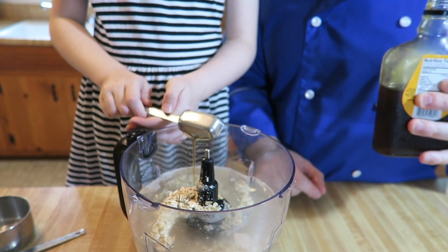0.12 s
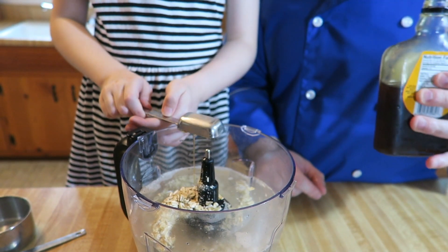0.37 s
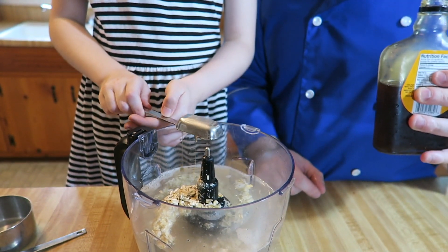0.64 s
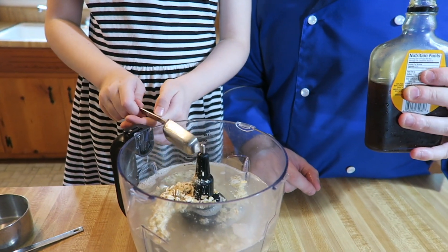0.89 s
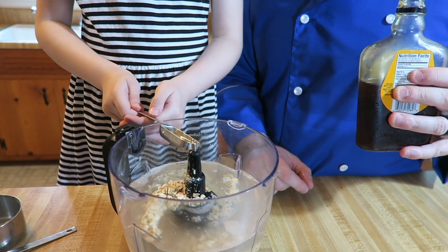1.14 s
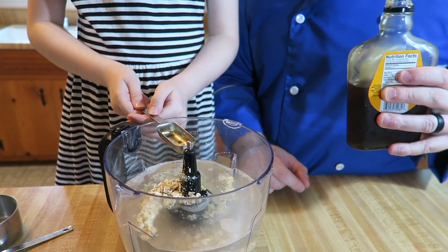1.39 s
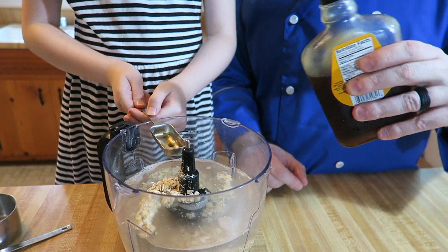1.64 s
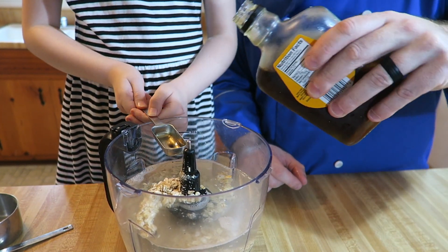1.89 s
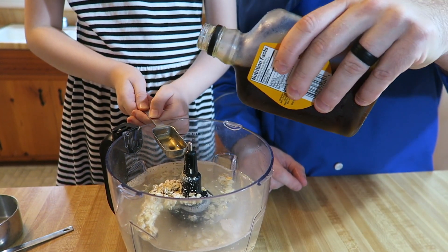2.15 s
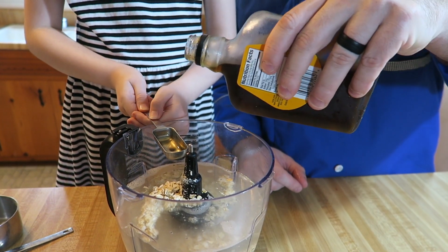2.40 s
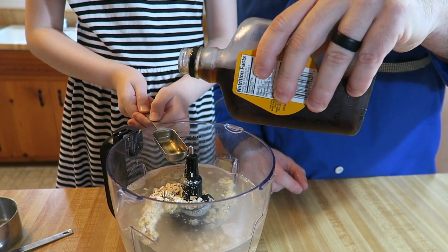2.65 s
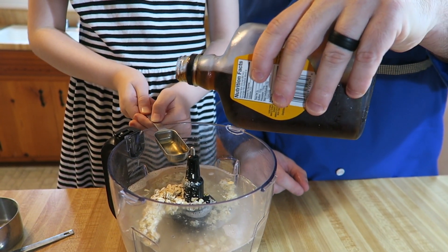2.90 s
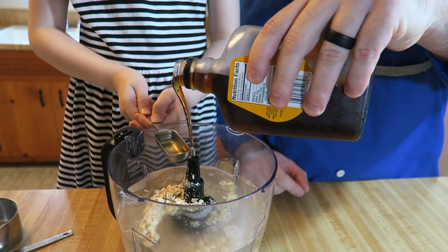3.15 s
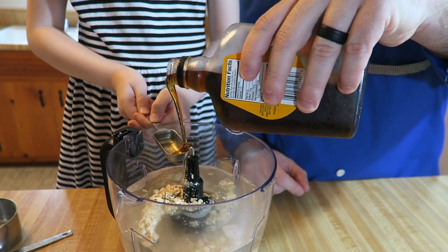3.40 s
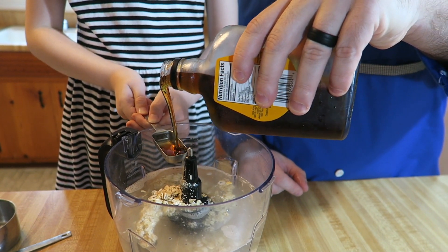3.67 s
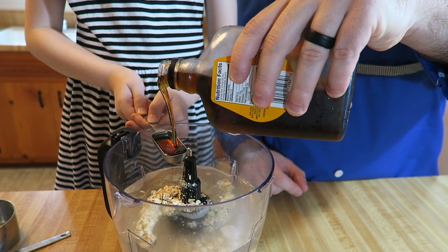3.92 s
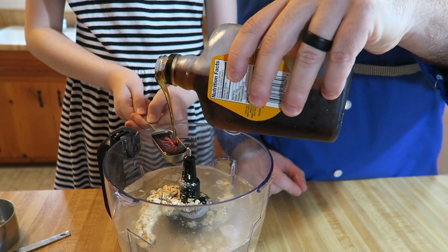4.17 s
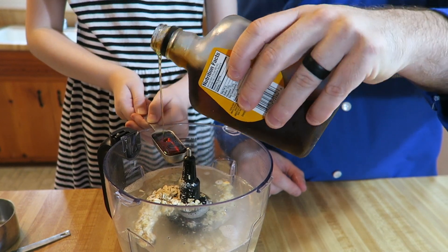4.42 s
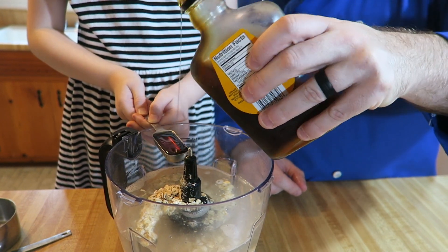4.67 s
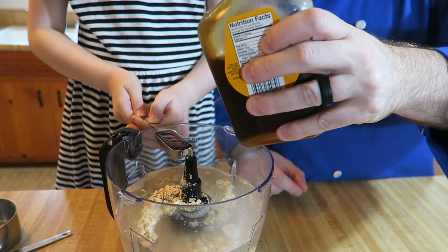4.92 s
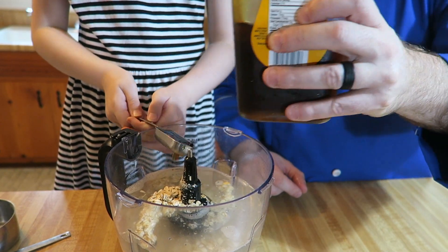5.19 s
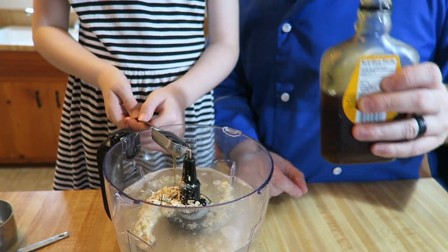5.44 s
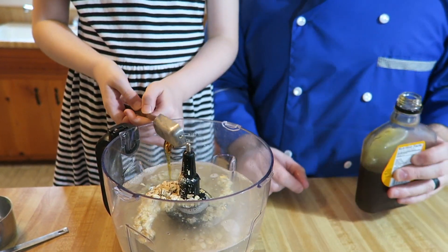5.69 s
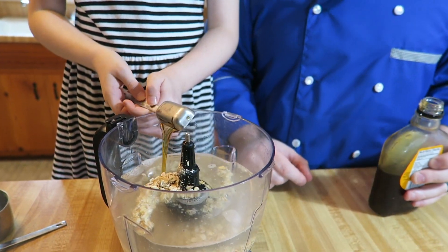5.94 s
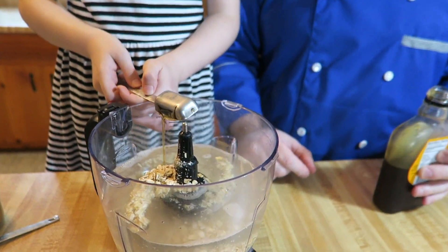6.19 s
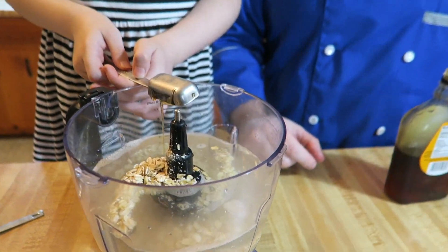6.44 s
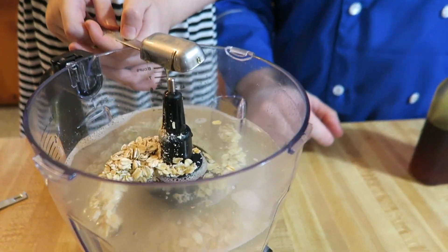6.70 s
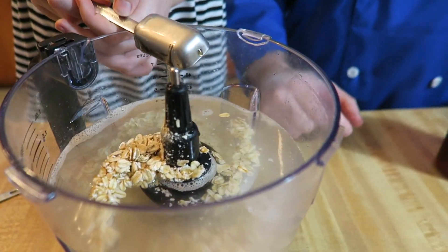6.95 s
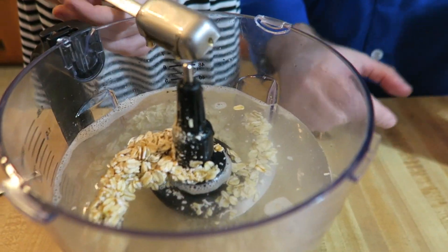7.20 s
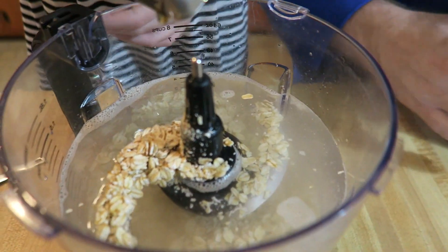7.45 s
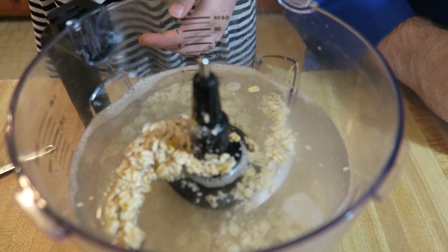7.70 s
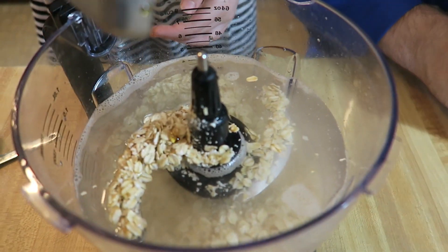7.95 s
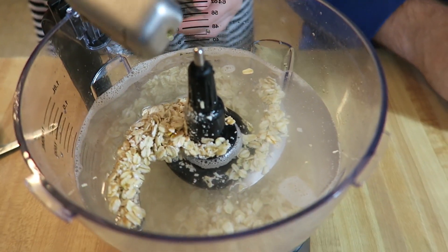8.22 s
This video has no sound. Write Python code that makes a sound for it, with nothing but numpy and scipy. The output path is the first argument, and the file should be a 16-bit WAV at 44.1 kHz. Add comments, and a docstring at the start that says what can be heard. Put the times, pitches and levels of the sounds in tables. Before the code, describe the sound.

A steady low fridge and fan hum with soft air hiss fills a kitchen, heard through a close stereo camera microphone. From about 0 to 2.4 s a bird outside sings faint, evenly paced falling whistles blurred by echoes. Light spoon taps on the plastic bowl come at 0.8, 1.0 and 1.2 s. Fine, even lens-motor ticking runs at 0.5-1.8, 3-4.9 and 6.1-7.5 s. A far engine's very low drone enters near 2.1 s and grows at the end. Small taps fall at 5.1 and 5.4 s with slight cloth rustle. At 6.1 s the bowl thumps loudly on the wooden counter, bouncing hollowly until 6.5 s; the background dips, and the bird sings again from about 5.8 to 8.3 s. At 7.5 s a sharp clink and short rim scrape lead into dense spoon clinks, dull knocks and sleeve rustle, strongest near 8.0 and 8.25 s.

```python
"""A kitchen hums with a fridge compressor and a fan, drawn as wavering sines, and air resonates in a duct as
narrow bands of noise. A bird sings two phrases outside as gliding whistles with echoes, and a far engine starts
to drone. A plastic bowl on a wooden counter is knocked and a metal spoon clinks: decaying sines and bursts of
noise. Sleeves rustle as flickering noise with snaps, and a lens motor ticks as evenly spaced clicks that ring.
The recorder's gain control turns everything down after the loudest knocks."""
import sys
import numpy as np
from scipy import signal
from scipy.fft import rfft, irfft, next_fast_len
from scipy.io import wavfile

SR = 44100
rng = np.random.default_rng(int(sys.argv[2]) if len(sys.argv) > 2 else 0)


def field_ratio(decibels):
    """Amplitude ratio for a level in dB (20 dB per decade); scalars and array-likes work."""
    return 10 ** (np.asarray(decibels, dtype=float) / 20)


def wrap_up_sound(samples):
    """Save the sound to the file named by the first command line argument, as 16-bit audio."""
    columns = np.atleast_2d(samples).T
    # keep every value between -1 and 1, then stretch to whole-number steps
    tamed = np.clip(columns, -1, 1)
    steps = np.round(tamed * 32767).astype(np.int16)
    wavfile.write(sys.argv[1], SR, steps)


N = 367794   # length of the scene in samples


def rms_one(x):
    """Scale a sound to rms 1."""
    return x / np.sqrt(np.mean(x ** 2) + 1e-20)


def at_hz(points, hz):
    """Read a spectrum at any pitch, with straight lines between its points on a log-frequency axis."""
    point_hz, db = np.transpose(points)
    return np.interp(np.log(hz), np.log(point_hz), db)


def drift(rate_hz):
    """Random wandering of spread 1: noise smoothed twice, so that little stays above the rate."""
    r = np.exp(-2 * np.pi * rate_hz * 40 / SR)   # worked out at every 40th sample only
    noise = rng.standard_normal(N // 40 + 2002)
    slow = signal.lfilter([1], [1, -2 * r, r * r], noise)[2000:]
    return np.interp(np.arange(N) / 40, np.arange(len(slow)), rms_one(slow - slow.mean()))


def fade(clicks, t60):
    """Each click starts a level that falls by 60 dB in t60 seconds."""
    return signal.lfilter([1], [1, -field_ratio(-60 / (t60 * SR))], clicks + 1e-18)


def ring(clicks, hz, t60):
    """Each unit click sets a sine of height 1 ringing, which falls by 60 dB in t60 seconds."""
    r, w = field_ratio(-60 / (t60 * SR)), 2 * np.pi * hz / SR
    return signal.lfilter([0, np.sin(w)], [1, -2 * r * np.cos(w), r * r], clicks + 1e-18)


def band_pass(x, low_hz, high_hz, order):
    """Keep the part of a sound between two pitches."""
    return signal.sosfilt(signal.butter(order, [low_hz, high_hz], "band", fs=SR, output="sos"), x)


def coloured(spectrum):
    """Stereo noise of a given colour whose sides agree in the bass and part in the treble; rms 1."""
    # likeness of left and right, 1 = the same: (frequency [Hz], likeness [-1 to 1])
    likeness = [(45, 0.94), (70, 0.92), (150, 0.61), (360, 0.38), (900, 0.55), (2210, 0.54), (5440, 0.12),
                (13400, -0.3)]
    size = next_fast_len(N)
    hz = np.maximum(np.arange(size // 2 + 1) * SR / size, 1)
    mid, side = rfft(rng.standard_normal((2, size)))
    alike = np.clip(at_hz(likeness, hz), -1, 1)
    pair = np.sqrt(1 + alike) * mid + np.sqrt(1 - alike) * side * [[1], [-1]]
    return rms_one(irfft(pair * field_ratio(at_hz(spectrum, hz)), size)[:, :N])


def room(x, t60, dull_hz, apart, rise):
    """Reflections as noise that builds up and dies, treble faster, partly different in each ear; energy 1."""
    t = np.arange(SR // 2) / SR
    shared, own = rng.standard_normal((2, len(t)))
    tail = (shared + apart * own * [[1], [-1]]) * np.minimum(t / rise, 1)
    low = signal.lfilter(*signal.butter(1, dull_hz, fs=SR), tail)
    tail = low * field_ratio(-60 * t / t60) + (tail - low) * field_ratio(-110 * t / t60)
    tail = tail / np.sqrt(np.sum(tail ** 2) / 2)
    return signal.fftconvolve(np.atleast_2d(x), tail, axes=1)[:, :N]


def hum():
    """Steady compressor and fan tones: sines whose level and phase waver slowly."""
    # tones of the motors: (frequency [Hz], rms level [dB], spread of the waver, either sign [dB])
    motor_tones = [(53.7, -45, 3.2), (107.5, -58.5, -4.5), (117.9, -44.5, 1), (160.5, -39.5, -1.5),
                   (239.2, -50.5, -3), (318, -52, 1.5), (1190, -67.5, 4)]
    t, out = np.arange(N) / SR, np.zeros(N)
    for hz, db, waver_db in motor_tones:
        level = np.sqrt(2) * field_ratio(db + waver_db * drift(4))
        out += level * np.sin(2 * np.pi * hz * t + 0.12 * waver_db * drift(8.7))
    return out


def duct():
    """Air noise held in the broad resonances of a duct in the room."""
    # resonances of the duct: (frequency [Hz], width [Hz], rms level [dB])
    duct_modes = [(489.8, 31, -56), (757, 33, -55)]
    out = np.zeros(N)
    for hz, width_hz, db in duct_modes:
        noise = band_pass(rng.standard_normal(N), hz - width_hz / 2, hz + width_hz / 2, 2)
        out += field_ratio(db) * rms_one(noise)
    return out


def room_air():
    """Room air and microphone hiss: wide stereo noise, strongest in the bass, that wavers a little."""
    # colour of the noise: (frequency [Hz], relative level per Hz [dB])
    air_colour = [(30, -58.5), (43, -35), (62, -7.5), (85, -9.5), (112, -7), (137, -14), (180, -2),
                  (300, -5.5), (430, -6.5), (600, -14.5), (760, -14), (900, -17), (1300, -20.5),
                  (1900, -26), (4000, -35), (8000, -45), (12300, -49.5), (14500, -57.5)]
    return field_ratio(-42 + 0.5 * drift(3.0)) * coloured(air_colour)


def whistle(start, glide, husk):
    """A gliding whistle, each time a little different in pitch: progress 0-1, planned pitch, tone."""
    s, glide_hz = np.transpose(glide)
    t = np.arange(N) / SR - start
    hz = np.interp(t, s, glide_hz)
    phase = 2 * np.pi * np.cumsum(hz * rng.normal(1, 0.006)) / SR
    tone = np.sin(phase + husk) * (t > 0) * (t < s[-1])
    return np.clip(t / s[-1], 0, 1), hz, tone


def bird():
    """Quick falling notes at an even pace, heard from outside: a weak straight path and two sets of echoes."""
    # phrases: (start [s], notes [count], then first, middle and last note before the echoes, each [dB])
    phrases = [(.229, 11, -56.5, -56, -54.5), (5.972, 13, -58, -54, -52)]
    # pitch of a note, which falls and lingers in the middle: (time from its start [s], frequency [Hz])
    falling_note = [(0, 5900), (.016, 5200), (.04, 4850), (.054, 3800), (.075, 3450), (.092, 3200),
                    (.11, 2500), (.132, 1780)]
    # soft first note, which rises and levels off: (time from its start [s], frequency [Hz])
    opening_note = [(0, 1800), (.03, 2020), (.07, 2280), (.115, 2300)]
    # a note is loud where it passes a resonance of the throat: (frequency [Hz], level [dB])
    throat = [(1780, -8), (2000, -4.5), (2450, 0.5), (2900, -2.5), (3150, -12), (3380, 1), (3550, -5.5),
              (3750, -1.5), (3950, -14), (4400, -15), (4950, -8), (5300, -13.5), (6200, -16)]
    opening_lead_s, opening_db, note_gap_s = 0.22, -1.5, 0.198
    out = np.zeros(N)
    husk = 1.15 * drift(400)   # radians; fast flutter spreads each whistle into a band
    for start, count, *swell_db in phrases:
        done, _, tone = whistle(start - opening_lead_s, opening_note, husk)
        out += field_ratio(swell_db[0] + opening_db) * np.sin(np.pi * done) ** 2 * tone
        note_levels = np.interp(np.linspace(0, 2, int(count)), range(3), swell_db)
        for k, db in enumerate(note_levels):
            _, hz, tone = whistle(start + k * note_gap_s, falling_note, husk)
            out += field_ratio(db + rng.normal(0, 1.0) + at_hz(throat, hz)) * tone
    cluster = room(out, t60=0.16, dull_hz=12000, apart=0.3, rise=0.008)   # smeared near echoes
    tail = room(out, t60=0.55, dull_hz=7000, apart=0.13, rise=0.05)       # long far echoes
    return field_ratio(-8) * out + field_ratio(5) * cluster + field_ratio(1.5) * tail


def lens():
    """Motor steps on an even clock with uneven strength shake the case; the two ports hear opposite signs."""
    # spells of focusing: (start [s], end [s], click level before the case rings [dB])
    spells = [(.52, 1.751, -50.5), (2.97, 3.8, -51), (3.98, 4.853, -50), (6.1, 7.5, -52.5)]
    # resonances of the camera case: (frequency [Hz], level [dB], t60 [s])
    case_modes = [(3060, 2, 0.014), (3700, 3, .01)]
    steps = np.arange(0, N, SR // 60) + 110   # 60 steps per second
    every_third = np.arange(len(steps)) % 3 == 2
    sizes = field_ratio(-5.5 * rng.exponential(1, len(steps)) + 2.4 * every_third)
    clicks = np.zeros(N + SR)
    for start, end, db in spells:
        on = (steps > start * SR) & (steps < end * SR)
        clicks[steps[on]] = field_ratio(db) * sizes[on]
    ticks = sum(field_ratio(db) * ring(clicks[:N], hz, t60) for hz, db, t60 in case_modes)
    return ticks * np.array([[0.8], [-1]])


def clinks():
    """A short crack of noise round a centre pitch, and the spoon's modes near it left ringing."""
    # clinks and ticks: (time [s], level [dB], centre frequency [Hz], share of spoon ring [0-1])
    contacts = [(0.814, -32, 9500, 0.05), (1.025, -24.5, 1140, 0.01), (1.178, -31.5, 1200, 0.02),
                (5.052, -45, 1470, 0.01), (5.397, -28.5, 1260, 0.03), (6.793, -30.5, 1710, 0),
                (6.818, -34, 10000, 0), (7.18, -45, 9950, 0.1), (7.408, -50, 9800, 0.1),
                (7.502, -15.5, 3150, 0.08), (7.5315, -38, 10000, 0), (7.706, -39, 6700, 0.2),
                (7.797, -46, 4800, 0.07), (7.82, -40, 7360, 0.05), (7.905, -37, 7350, 0.1),
                (7.956, -41.5, 6700, 0.2), (8.198, -31, 5200, 0.24), (8.217, -34, 8000, 0),
                (8.244, -38, 7000, 0.02), (7.741, -42, 5800, 0.32), (7.887, -28, 2340, 0.12),
                (8.004, -31, 6700, 0.15), (8.022, -18.5, 2900, 0.06), (8.08, -25, 2060, 0.14),
                (8.141, -36, 4970, 0.27), (8.18, -38, 4650, 0.24)]
    # ringing modes of the metal spoon: (frequency [Hz], level [dB], t60 [s])
    spoon_modes = [(1796, 13, 0.025), (2360, -1, 0.15), (2670, -13, 0.39), (2980, -11, 0.17),
                   (3260, 1.5, 0.05), (3900, 6.5, 0.046), (5800, -3, 0.12), (6700, -6, 0.22)]
    pan_db, spill_db, crack_db = -1, -32, -11   # left against right; spread over all pitches; crack level
    out, t = np.zeros((2, N + SR)), np.arange(SR // 4) / SR
    for s, db, hz, share in contacts:
        noise = rng.standard_normal((2, len(t)))
        shared, own = band_pass(noise, hz / 1.25, min(hz * 1.25, 0.45 * SR), 3)
        # short waves reach the two ports differently
        crack = rms_one(shared + hz / 6500 * own * [[1], [-1]])
        spill = band_pass(noise, 900, 7000, 1)
        crack += field_ratio(spill_db) * rms_one(spill[0] + 0.6 * spill[1] * [[1], [-1]])
        # the struck spot rings at the centre pitch, the brightest ticks hardly at all
        crack += np.sin(2 * np.pi * hz * t) / (1 + (hz / 5500) ** 4)
        # a crack at 1500 Hz takes 0.038 s to fall by 60 dB, brighter ones less
        crack = crack * field_ratio(crack_db - 60 * t / 0.038 * (hz / 1500) ** 0.24)
        spoon = np.zeros(len(t))
        for mode_hz, mode_db, t60 in spoon_modes:
            octaves_off = abs(np.log2(mode_hz / hz))
            spoon += field_ratio(mode_db - 21.4 * octaves_off - 60 * t / t60) * np.sin(2 * np.pi * mode_hz * t)
        at = int(s * SR)
        sides = field_ratio(db + pan_db * np.array([[0.5], [-0.5]]))
        out[:, at:at + len(t)] += sides * (crack + np.clip(share, 0, 1) * spoon)
    return out[:, :N]


def slaps():
    """Hard contacts crack over a broad range of pitches: bursts of noise that die at once."""
    # hard contacts: (time [s], rms level at the start [dB], dull above this frequency [Hz])
    hard_contacts = [(1.027, -35, 1400), (1.178, -34, 1410), (6.094, -28.5, 3200), (6.276, -41, 2980),
                     (6.393, -34.5, 3430), (6.433, -36, 2500), (6.793, -45, 6000), (7.503, -38, 4180),
                     (8.023, -22, 4430), (8.08, -35, 4000), (8.179, -37, 7000), (8.247, -30.5, 2500)]
    out, t = np.zeros((2, N + SR)), np.arange(SR // 16) / SR
    for s, db, dull_hz in hard_contacts:
        shared, own = band_pass(rng.standard_normal((2, len(t))), 554, dull_hz, 3)
        at = int(s * SR)
        burst = rms_one(shared + 0.65 * own * [[1], [-1]])
        out[:, at:at + len(t)] += field_ratio(db - 60 * t / 0.022) * burst
    return out[:, :N]


def knocks():
    """Each knock strikes every mode of bowl and counter, rings until the bowl settles, and clatters briefly."""
    # knocks and the bounces that follow: (time [s], level [dB], depth: tilt of the modes below 190 Hz [dB],
    # hardness: tilt of the modes above 600 Hz [dB], free ring [s], pitch of the main ring [Hz])
    strikes = [(1.042, -40, -0.5, -24, 0.025, 280), (6.091, 0, -19.5, -18.5, 0.022, 277.5),
               (6.123, -9, -27, -23, 0.013, 273), (6.212, -29, -15.5, -31, 0.032, 267),
               (6.146, -18.5, -13, -31, 0.014, 280), (6.164, -17, -16, -32, 0.031, 280),
               (6.275, -14, -5, -10.5, 0.021, 273), (6.317, -23.5, -13, -20.5, 0.14, 280),
               (6.384, -21, -19, -16, 0.019, 280), (6.392, -7.5, -15, -20, 0.037, 280),
               (6.43, -8.5, -19, -16, 0.011, 276), (6.449, -13, -14.5, -22, 0.033, 280),
               (6.49, -26, -8.5, -14, 0.028, 280), (7.505, -27.5, -17, -15.5, 0.015, 304),
               (7.555, -27.5, -14, -37, 0.04, 306), (7.632, -24, -6.5, -24, 0.02, 301),
               (7.817, -28, -7, -34, 0.016, 286), (7.836, -24.5, -6, -21, 0.024, 321),
               (7.859, -18, -12, -25, 0.0097, 305), (7.866, -21, -7, -32, 0.012, 310),
               (7.888, -27.5, -2, -16.5, 0.026, 304), (7.987, -27, -4, -31, 0.0096, 280),
               (8.006, -16.5, -14, -42, 0.015, 292), (8.023, -11.5, -19, -27, 0.025, 280),
               (8.054, -37, 14, -30, 0.019, 280), (8.08, -19.5, -6.5, -31, 0.042, 288.5),
               (8.235, -16, -23, -31, 0.0042, 267), (8.244, -16, -22, -35, 0.0071, 303),
               (8.251, -8.5, -18, -15.5, 0.0182, 296), (8.264, -15, -6, -23, 0.017, 297),
               (8.284, -22.5, -8.5, -17, 0.046, 300)]
    # modes of bowl and counter: (frequency [Hz], level [dB], t60 while ringing freely [s])
    bowl_modes = [(70.5, -6, 0.45), (147.7, -2, 0.56), (181, 7.5, 0.39), (280, -0.5, 0.32),
                  (261, 9, 0.0093), (318, -13, 0.79), (422, -14.5, 0.15), (630, -6, 0.082), (792, 2, 0.019),
                  (945, 9.5, 0.021), (1263, 0, 0.012), (2260, -13, 0.03)]
    main_ring_hz, muted_t60 = 280, 0.022   # once the bowl sits down again, the ring dies this fast
    clatter_db, clatter_follows = -17, 0.79   # level against the knock; share of the hardness added
    out, t = np.zeros(N), np.arange(SR // 4) / SR
    for mode_hz, mode_db, t60 in bowl_modes:
        mode = np.zeros(N + SR)
        for s, db, depth_db, hard_db, free_s, pitch_hz in strikes:
            tilt_db = at_hz([(190, depth_db), (230, 0), (500, 0), (600, hard_db)], mode_hz)
            chance_db = min(mode_hz / 280, 3) * rng.standard_normal()
            muted_db = -60 * np.maximum(t - free_s, 0) / muted_t60
            # grip and seating shift the bowl's wall modes along with its main ring
            hz = mode_hz * (pitch_hz / main_ring_hz if 230 < mode_hz < 500 else 1)
            level = field_ratio(db + mode_db + tilt_db + chance_db + muted_db - 60 * t / t60)
            at = int(s * SR)
            mode[at:at + len(t)] += level * np.sin(2 * np.pi * hz * t)
        # a soft contact: the mode swells over a cycle
        out += band_pass(mode[:N] + 1e-18, mode_hz / 1.65, mode_hz * 1.65, 2)
    clicks = np.zeros(N)
    for s, db, _, hard_db, _, _ in strikes:
        clicks[int(s * SR)] = field_ratio(db + clatter_db + clatter_follows * hard_db)
    dying = field_ratio(-8.0) * fade(clicks, 0.28) + field_ratio(-9.5) * fade(clicks, 0.1)
    clatter = band_pass(rng.standard_normal(N), 450, 1700, 1)
    clatter = signal.lfilter(*signal.butter(2, 4000, fs=SR), clatter)
    return out + dying * rms_one(clatter)


def drone():
    """A far engine: one low tone that swells in and then follows a level curve."""
    # level of the engine: (time [s], rms level [dB])
    engine_level = [(2.1, -60), (2.4, -48), (4.2, -46.5), (5, -47), (7, -51.5), (8.34, -40.5)]
    s, db = np.transpose(engine_level)
    t = np.arange(N) / SR
    swell = np.clip((t - s[0]) / 0.25, 0, 1)   # fades in over 0.25 s
    return np.sqrt(2) * swell * field_ratio(np.interp(t, s, db)) * np.sin(2 * np.pi * 65.6 * t)


def rustle():
    """Cloth rubbing: noise that flickers in clumps, with snaps of different pitch under each movement."""
    # how hard sleeves and hands rub: (time [s], level before the boost at the end [dB])
    rubbing = [(4.9, -90), (5.3, -73), (5.68, -64.5), (6.08, -75), (6.5, -81), (7.0, -70), (7.5, -67.5),
               (7.62, -62.5), (7.9, -62), (8.24, -57.5), (8.34, -64.5)]
    # short scuffs: (time of the peak [s], level before the boost at the end [dB])
    scuffs = [(7.56, -59.5), (8.024, -51.5), (8.189, -59.5)]
    # colour of the cloth: (frequency [Hz], relative level [dB])
    cloth_colour = [(600, 6), (2000, -2.5), (4000, -8), (8000, -15.5), (12000, -19.5), (15000, -33)]
    t = np.arange(N) / SR
    s, db = np.transpose(rubbing)
    level = field_ratio(np.interp(t, s, db, -150, -150))
    for s, db in scuffs:
        level += field_ratio(db - np.maximum(480 * (s - t), 210 * (t - s)))   # rise and fall in dB per second
    # creases crackle less than in proportion when the rubbing is below this level (before the boost)
    strength = level * np.minimum(level / field_ratio(-57), 1)
    snap_sizes = field_ratio(3 * np.minimum(rng.exponential(1, N), 3))
    snaps = (rng.random(N) < 260 / SR) * snap_sizes * strength   # on average 260 chances per second
    dealt = rng.integers(0, 4, N)   # each snap gets one of four pitches
    white, crackle = rng.standard_normal((2, N)), np.zeros((2, N))
    for k, hz in enumerate([2000, 3300, 5500, 9000]):
        bursts = fade(snaps * (dealt == k), 0.006)
        noise = rms_one(band_pass(white + white[0], hz / 1.3, hz * 1.3, 2))
        crackle += field_ratio(at_hz(cloth_colour, hz)) * bursts * noise
    rub = level * field_ratio(2.8 * drift(41)) * coloured(cloth_colour)
    return field_ratio(14.5) * (rub + field_ratio(-1) * crackle)


def scrape():
    """The spoon drags over the rim: catches that tick and ring, over a ring that slides down in pitch."""
    # where the spoon catches: (time [s], relative level [dB])
    catches = [(7.541, -11), (7.546, -3), (7.5515, 0), (7.558, -2), (7.564, -4), (7.570, -10), (7.577, -2)]
    start_s, slide_s = 7.541, 0.036
    t = np.arange(SR // 8) / SR
    times, db = np.transpose(catches)
    clicks = np.zeros(len(t))
    clicks[(np.abs(times - start_s) * SR).astype(int)] = field_ratio(db)
    bright = band_pass(rng.standard_normal((2, len(t))), 2500, 11000, 2)
    puffs = fade(clicks, 0.032) * bright
    hz = 2050 + (1780 - 2050) * np.minimum(t / slide_s, 1)
    rough = 1.0 * drift(250)[:len(t)]   # radians
    slide = fade(clicks, 0.037) * np.sin(2 * np.pi * np.cumsum(hz) / SR + rough)
    sound = field_ratio(-27.5) * ring(clicks, 4160, 0.0056) + field_ratio(-34) * slide + field_ratio(-38) * puffs
    out, at = np.zeros((2, N + SR)), int(start_s * SR)
    out[:, at:at + len(t)] = sound
    return out[:, :N]


def kitchen_echo(low, high):
    """The kitchen's walls answer the knocks and clinks, without their bass."""
    sent = field_ratio(-10) * low + field_ratio(-9) * high
    sent = signal.lfilter(*signal.butter(2, 520, "high", fs=SR), sent)
    return room(sent, t60=0.41, dull_hz=2500, apart=0.12, rise=0.00057)


def scene():
    """Hum and air, the bird, the engine and the lens, and the near knocks with the kitchen's echo."""
    background = hum() + duct() + room_air() + bird() + lens() + drone()
    high = clinks() + slaps() + scrape()
    low = knocks() * field_ratio(np.array([[0.65], [-0.65]]))   # dB: a little to the left
    return background + rustle() + low + high + kitchen_echo(low, high)


def top_cut(x):
    """Nothing passes above the cut-off."""
    return signal.sosfilt(signal.butter(12, 14010, fs=SR, output="sos"), x)


def record(dry):
    """Cuts the deepest bass, turns down fast above a threshold and recovers slowly, and rounds off peaks."""
    peak_db = 20 * np.log10(np.abs(dry).max(axis=0) + 1e-9)
    over_db = 0.2 * np.maximum(peak_db + 22, 0)   # 0.2 dB down for each dB above -22 dB
    ramp_db = 6.2 * np.arange(N) / SR             # recovery, 6.2 dB per second
    held_db = np.maximum.accumulate(over_db + ramp_db) - ramp_db
    r = np.exp(-1 / (0.0025 * SR))                # the gain follows within about 2.5 ms
    smooth_db = signal.lfilter([1 - r], [1, -r], held_db)
    thin = signal.sosfilt(signal.butter(3, 42, "high", fs=SR, output="sos"), dry)
    ducked = thin * field_ratio(-smooth_db)
    return top_cut(np.tanh(ducked ** 3 / 3 + ducked))


dry = scene()
out = record(dry)
wrap_up_sound(out)
```